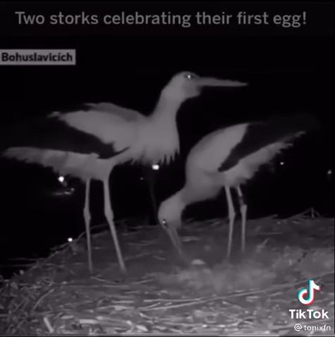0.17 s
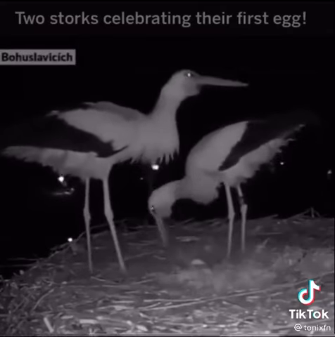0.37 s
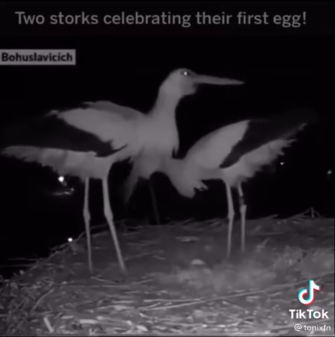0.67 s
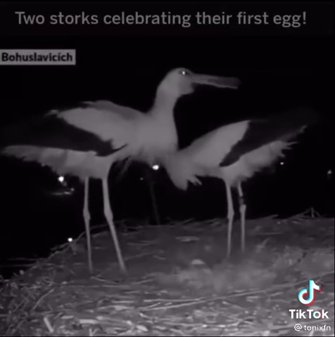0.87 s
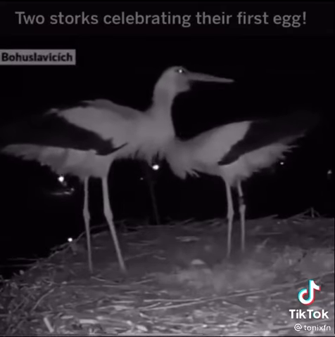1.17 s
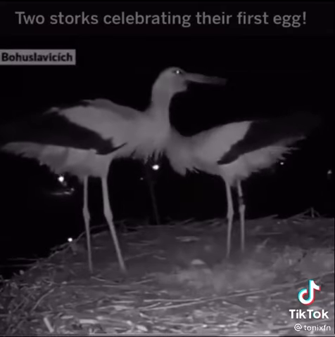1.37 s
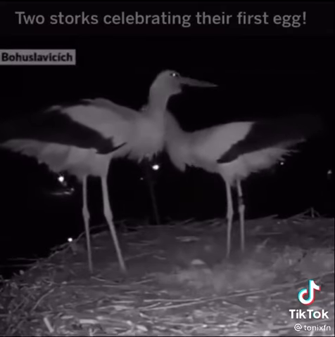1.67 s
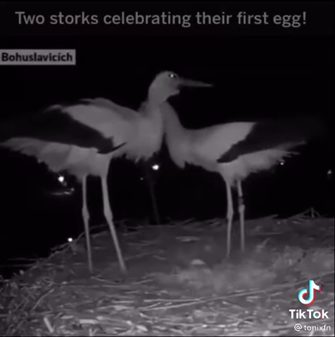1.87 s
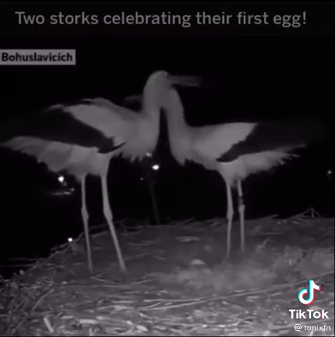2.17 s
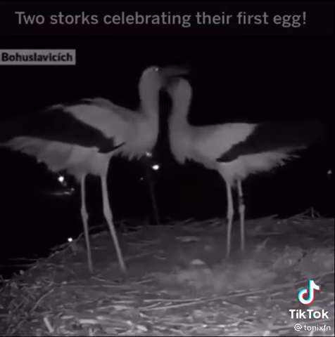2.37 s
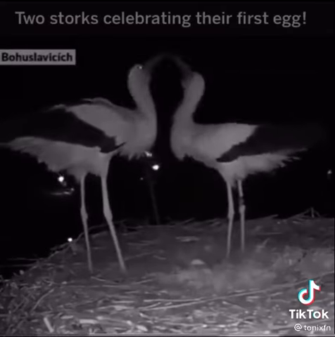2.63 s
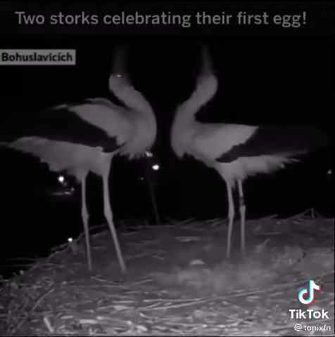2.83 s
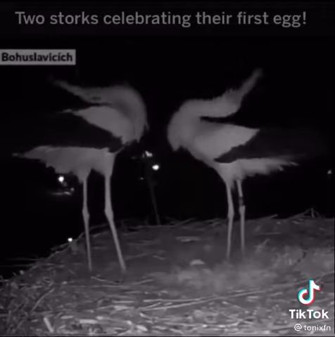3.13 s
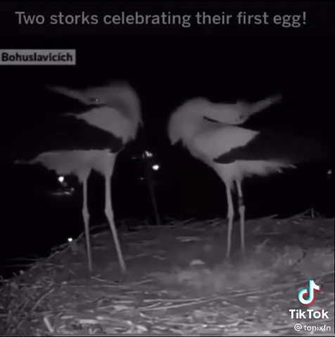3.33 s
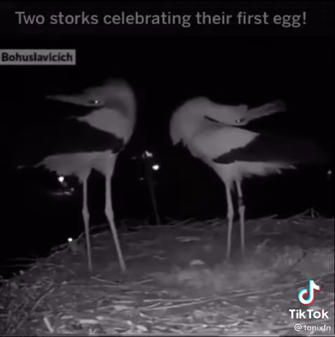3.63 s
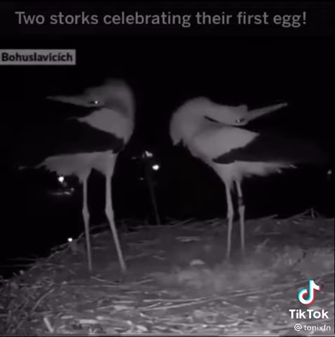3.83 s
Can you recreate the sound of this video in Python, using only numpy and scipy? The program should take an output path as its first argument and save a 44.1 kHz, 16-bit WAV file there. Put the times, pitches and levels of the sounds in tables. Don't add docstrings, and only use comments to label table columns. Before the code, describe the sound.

Stork bill-clattering begins at once: short, dry, hollow knocks, seven or eight per second, with two very faint breathy hisses in the first 0.3 seconds. A second stork enters softly near 0.9 and strengthens after 2.2. From about 2.6 the claps quicken slightly, brighten and interlock into a loud rattle, strongest around 3.1-3.7, continuing to the end at 4. Faint night rumble and soft wind bumps lie beneath.

```python
import sys
import numpy as np
from scipy import signal
from scipy.io import wavfile

SR = 44100
rng = np.random.default_rng(int(sys.argv[2]) if len(sys.argv) > 2 else 0)


def attenuation_scalar(level_db):
    decades = np.asarray(level_db, float) / 20
    return 10 ** decades


def bounce(signal):
    frames = np.transpose(np.atleast_2d(signal))
    limited = np.clip(frames, -1, 1)
    pcm = np.round(limited * 32767).astype(np.int16)
    wavfile.write(sys.argv[1], SR, pcm)


N = 176400

# t/s, peak level/dB
LEFT_CLAPS = [(0.059, -11.5), (0.194, -9), (0.328, -9), (0.462, -8), (0.594, -8.5), (0.723, -8.5),
              (0.853, -8), (0.984, -7.5), (1.118, -7), (1.249, -7), (1.38, -8), (1.511, -7.5),
              (1.645, -13.5), (1.778, -9), (1.907, -9), (2.035, -8), (2.162, -7), (2.285, -3),
              (2.409, -3.5), (2.533, -3),
              (2.652, -4.5), (2.759, -3), (2.87, -4), (2.984, -4.5), (3.088, 0), (3.189, -4.5),
                   (3.291, 0.5), (3.393, 0), (3.493, 1), (3.595, 1.5), (3.696, 0), (3.798, -1),
                   (3.901, -1.5)]
# t/s, peak level/dB
RIGHT_CLAPS = [(0.878, -23), (1.037, -19), (1.189, -15.5), (1.338, -13.5), (1.485, -14), (1.627, -12.5),
               (1.772, -15), (1.913, -16), (2.05, -13.5), (2.186, -8.5), (2.319, -7.5), (2.445, -7.5),
               (2.575, -5.5), (2.702, -6), (2.829, -6), (2.951, -6.5), (3.07, -5.5), (3.192, -4),
               (3.311, -4), (3.426, -3.5), (3.544, -4), (3.659, -3), (3.776, -4), (3.894, -3)]
# t/s, low f/Hz, mid f/Hz, high f/Hz, low level/dB, high level/dB (re mid)
LEFT_THROAT = [(0, 753, 1640, 2083, -7.5, 1.5), (1.2, 719, 1712, 2290, -8, -2.5),
               (1.9, 750, 1770, 2350, -5.5, -3.5), (2.499, 763, 1714, 2430, -10.5, -16),
               (2.95, 886, 1746, 2780, -10, -43), (3.15, 890, 1630, 1970, -17, -6),
               (4, 914, 1636, 2070, -30, -24)]
RIGHT_THROAT = [(.8, 700, 1575, 2440, -2.5, 0), (1.6, 757, 1620, 2357, -4.5, 6),
                (1.9, 803, 1557, 2415, 0, 6.5), (2.4, 786, 1727, 2556, -13, -4),
                (3, 862, 1767, 2580, -12, -2.5), (3.299, 913, 1627, 2610, -20, 2.5),
                (4, 934, 1645, 2705, -7.5, 3.5)]
LEFT_THROAT_T60 = [.028, .015, .012]
RIGHT_THROAT_T60 = [.026, .014, .016]
# f/Hz, level/dB (re mid ring), T60/s
LEFT_BILL_MODES = [(2530, -16, 0.012), (3456, -18, 0.024), (4140, -46, 0.0062), (5400, -37, 0.003),
                   (6060, -49.5, .005), (8830, -18, 0.0016)]
RIGHT_BILL_MODES = [(1150, -35, 0.016), (3012, -9.5, 0.017), (3780, -17, 0.03), (4900, -10.5, 0.018),
                    (5840, -39, 0.006), (9200, -26, .004)]
# f/Hz, level/dB (re mid ring), T60/s
CONTACT_MODES = [(2407, 3, 0.0017), (5930, -12, 0.0019)]
# t/s, horn level/dB, level/dB of the first throat ring (re the rebound)
LEFT_TURN = [(0, 4, 2.5), (1.2, 1.5, 4), (2.2, 0.5, 5), (2.8, 1, -9), (3.2, 3.5, -5), (4, 3, -2.5)]
RIGHT_TURN = [(.8, -2.5, -6.5), (1.8, -0.5, -4), (2.4, -1, -7), (3, 1, -2.5), (3.3, -0.5, -7.5),
              (4, -1.5, -4.5)]
# delay t/s, level/dB
ECHOES = [
    (.0045, -31.5),
    (.0085, -28.5),
]
# f/Hz, density level/dB (per Hz)
NEST_SCATTER = [(400, -3), (800, -3.5), (2000, 6), (4000, -6.5), (7000, -20.5), (13000, -16.5)]
# start t/s, length t/s, level/dB
HISSES = [
    (0.021, 0.11, -52),
    (0.218, 0.092, -60.5),
]
# f/Hz, width f/Hz, level/dB
HISS_PEAKS = [(1110, 250, -1.5), (2330, 220, 3.5), (3130, 630, 5.5), (5470, 2600, -9), (7000, 600, -16)]
# t/s, peak level/dB
TWIGS = [
    (2.627, -29.5),
    (3.998, -30),
]
# f/Hz, density level/dB (per Hz)
NIGHT_SPECTRUM = [(12, -56), (20, -24.5), (363, -6.5), (715, -4), (1170, -9.5), (1660, -11.5), (1850, -9.5),
                  (3740, -25.5), (13000, -49)]
# t/s, level/dB
WIND_LEVEL = [(0.0, -60), (0.11, -64.5), (2.12, -66.5), (2.24, -57.5), (2.77, -68), (2.88, -59),
              (2.93, -80), (3.19, -52), (3.24, -75), (3.3, -62), (3.64, -62.5), (3.74, -47), (3.77, -51),
              (4.0, -62)]
TREBLE_BAND = [8400, 12400]


def at_time(table, s):
    columns = np.transpose(table)
    return [np.interp(s, columns[0], column) for column in columns[1:]]


def add(out, s, sound):
    i = int(s * SR)
    out[i:i + len(sound)] += sound


def strike(u, gain, hz, t60):
    modes = np.sin(2 * np.pi * hz[:, None] * u) * attenuation_scalar(-60 * u / t60[:, None])
    return gain @ modes * (1 - np.exp(-u / .00008))


def bill(claps, throat, turn, throat_t60, modes, rebound_cycles, rebound_db, trim_db, scatter, treble):
    pitch_spread, strength_spread_db = .006, .8
    travel_s = .0007
    rebound_dull_hz = 4400
    scatter_db, scatter_t60_s = -21, .022
    linger_db, linger_t60_s = -32, .036
    lead_db, lead_s = -36, .0061
    treble_db, treble_spread_db, treble_hold_s = -50, 5, .019

    out = np.zeros(N + SR)
    t = np.arange(SR // 8) / SR
    lead = np.arange(int(lead_s * SR))
    horn = np.array([*modes, *CONTACT_MODES])
    t60 = np.r_[throat_t60, horn[:, 2]]
    snap = t60 < .003
    tail = attenuation_scalar(scatter_db - 60 * t / scatter_t60_s) + attenuation_scalar(linger_db - 60 * t / linger_t60_s)
    chance = rng.standard_normal((len(claps), 25))
    for (s, db), luck in zip(claps, chance):
        low, mid, high, low_db, high_db = at_time(throat, s)
        horn_db, first_db = at_time(turn, s)
        hz = np.r_[low, mid, high, horn[:, 0]] * (1 + pitch_spread * luck[:11])
        level_db = np.r_[low_db, 0, high_db, horn[:, 1] + horn_db]
        level = attenuation_scalar(level_db + strength_spread_db * luck[11:22])

        first = level * np.where(snap, 1, attenuation_scalar(first_db))
        second = level * np.where(snap, attenuation_scalar(rebound_db), 1)
        second = second / (1 + (hz / rebound_dull_hz) ** 4)
        since_rebound = np.maximum(t - rebound_cycles / mid, 0)
        clap = strike(t, first, hz, t60) + strike(since_rebound, second, hz, t60)
        clap = clap + sum(attenuation_scalar(e) * np.interp(t - lag, t, clap, left=0) for lag, e in ECHOES)

        start = int(s * SR)
        hold_s = treble_hold_s * attenuation_scalar(3 * luck[23])
        burst = attenuation_scalar(treble_db + treble_spread_db * luck[22] - 20 * (t / hold_s) ** 3)
        noise = tail * scatter[start:start + len(t)] + burst * treble[start:start + len(t)]
        onset = np.minimum(t / .00033, 1)
        add(out, s + travel_s, attenuation_scalar(db) * (attenuation_scalar(trim_db) * clap + onset * noise))
        lead_in = lead / len(lead) * scatter[start + 9000 + lead]
        add(out, s + travel_s - lead_s, attenuation_scalar(db + lead_db) * lead_in)
    return out[:N]


def treble_noise():
    band = signal.butter(3, TREBLE_BAND, "band", fs=SR, output="sos")
    treble = signal.sosfilt(band, rng.standard_normal(2 * N))
    return treble * np.tile(attenuation_scalar(3.5 * drift(60)), 2)


def hiss():
    t = np.arange(N) / SR
    air = rng.standard_normal(N)
    out = 0
    for hz, width_hz, db in HISS_PEAKS:
        peak = signal.iirpeak(hz, hz / width_hz, fs=SR)
        band = signal.lfilter(*peak, signal.lfilter(*peak, air))
        out = out + attenuation_scalar(db + 2.5 * drift(30)) * band / band.std()
    swell = 0
    for s, length, db in HISSES:
        swell = swell + attenuation_scalar(db) * np.sin(np.pi * np.clip((t - s) / length, 0, 1)) ** 1.5
    return out * swell


def twigs():
    hz, t60_s = 2050, .0028
    out = np.zeros(N + SR)
    t = np.arange(SR // 50) / SR
    for s, db in TWIGS:
        tick = np.sin(2 * np.pi * hz * t) + .17 * rng.standard_normal(len(t))
        add(out, s, attenuation_scalar(db - 60 * t / t60_s) * tick)
    return out[:N]


def wind():
    band = signal.butter(3, [22, 105], "band", fs=SR, output="sos")
    low = signal.sosfilt(band, rng.standard_normal(N + SR))[SR:]
    gust_db, = at_time(WIND_LEVEL, np.arange(N) / SR)
    trim_db, lump_db = -8, 2
    return attenuation_scalar(gust_db + trim_db + lump_db * drift(4.8)) * low / low.std()


def night():
    return attenuation_scalar(-54.5) * coloured(NIGHT_SPECTRUM, patchy_db=2)


def coloured(spectrum, patchy_db=0):
    out = 0
    edges = 18 * 2 ** np.arange(0, 10, .5)
    points_hz, points_db = np.transpose(spectrum)
    white = rng.standard_normal((2, N + 8000))
    shared = drift(13.6)
    for k, (low, high) in enumerate(zip(edges, edges[1:])):
        sos = signal.butter(2, [low, high], "band", fs=SR, output="sos")
        band = signal.sosfilt(sos, white[k % 2])[8000:]
        level_db = np.interp(np.log(low * high) / 2, np.log(points_hz), points_db)
        flicker = (drift(8) + 1.3 * shared) * np.clip(low / 4000, .2, 1.5)
        out = out + attenuation_scalar(level_db + patchy_db * flicker) * band
    return out / out.std()


def drift(rate):
    r = np.exp(-80 * np.pi * rate / SR)
    slow = signal.lfilter([1], [1, -2 * r, r * r], rng.standard_normal(N // 40 + 2002))[2000:]
    return np.interp(np.arange(N) / 40, np.arange(len(slow)), slow / slow.std())


def scene():
    scatter = np.tile(coloured(NEST_SCATTER), 2)
    treble = treble_noise()
    left = bill(LEFT_CLAPS, LEFT_THROAT, LEFT_TURN, LEFT_THROAT_T60,
                LEFT_BILL_MODES, rebound_cycles=2.139, rebound_db=-8, trim_db=-10.5,
                scatter=scatter, treble=treble)
    right = bill(RIGHT_CLAPS, RIGHT_THROAT, RIGHT_TURN, RIGHT_THROAT_T60,
                 RIGHT_BILL_MODES, rebound_cycles=2.06, rebound_db=-3, trim_db=-8.5,
                 scatter=scatter[N // 2:], treble=treble[N // 2:])
    birds = signal.sosfilt(signal.butter(4, 480, "high", fs=SR, output="sos"), left + right)
    air = attenuation_scalar(-72 + 2.5 * drift(12)) * treble[N:]
    return (birds + hiss() + twigs() + night() + air + wind())[None]


def band_limit(x):
    return signal.sosfilt(signal.butter(12, 13430, fs=SR, output="sos"), x)


def record(dry):
    dull = signal.sosfilt(signal.butter(2, 6000, fs=SR, output="sos"), dry)
    cut = signal.sosfilt(signal.butter(10, 13300, fs=SR, output="sos"), dull)
    return band_limit(cut)


dry = scene()
out = record(dry)
bounce(out)
```